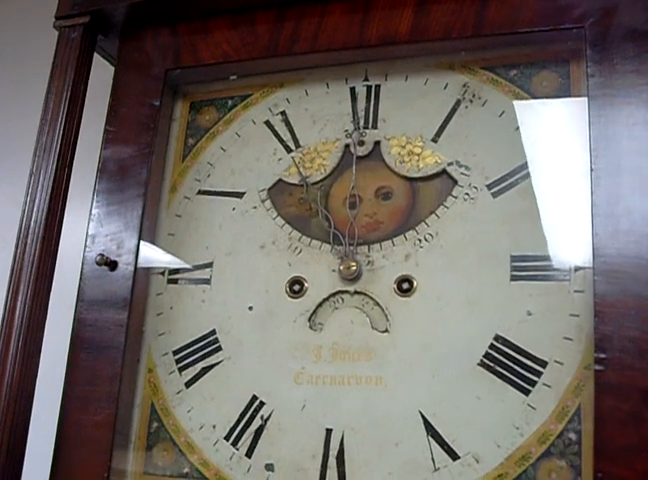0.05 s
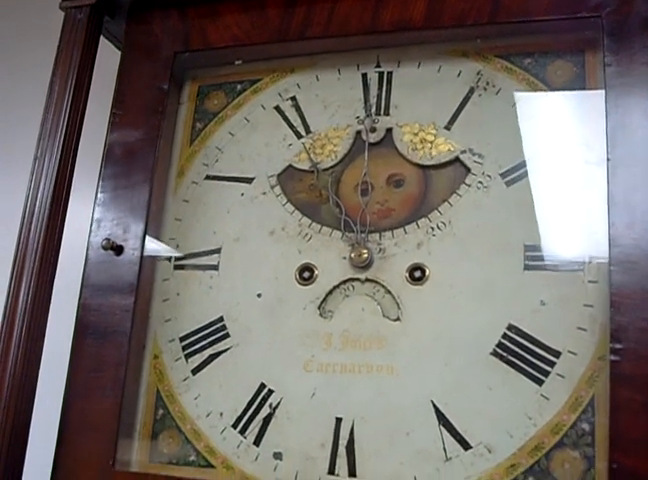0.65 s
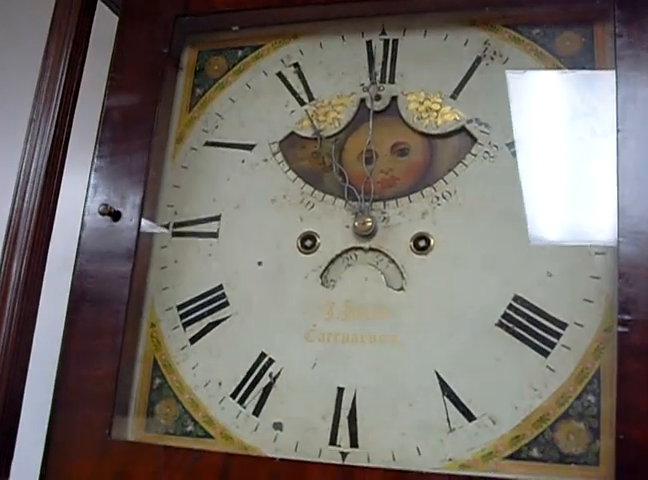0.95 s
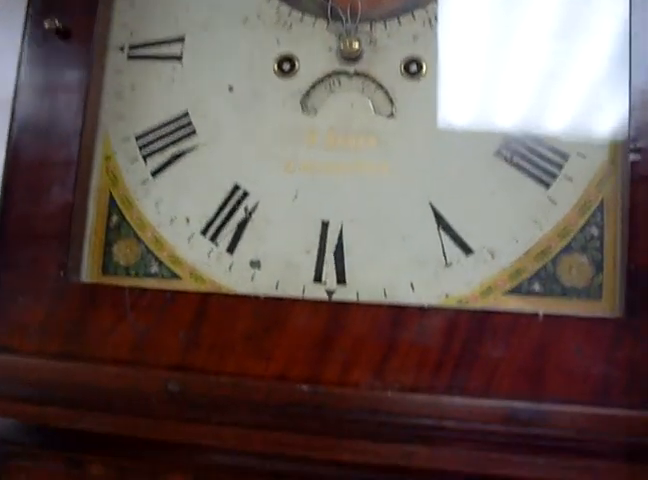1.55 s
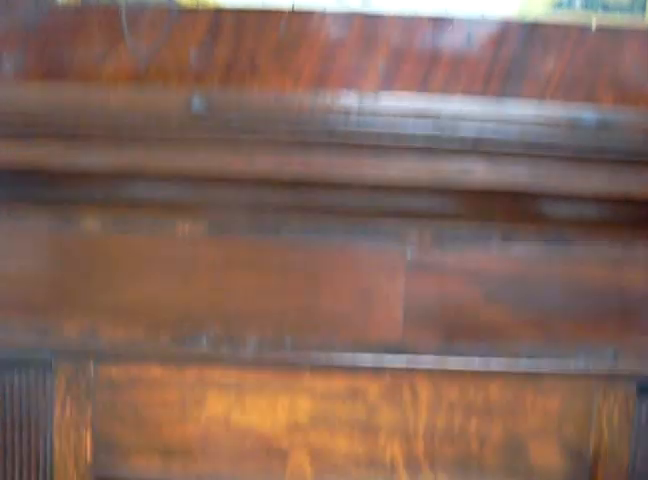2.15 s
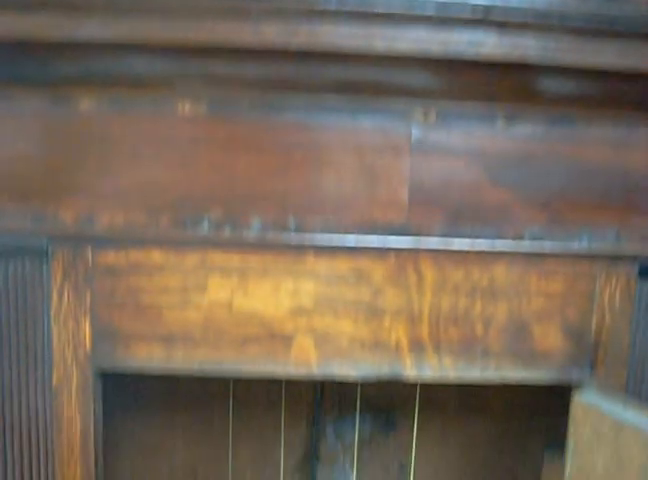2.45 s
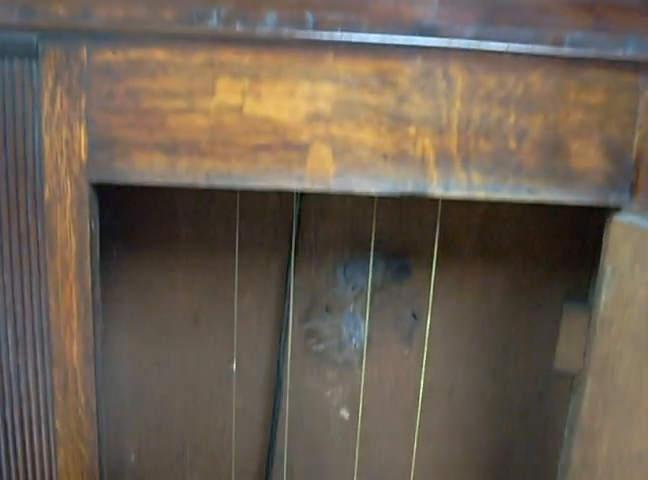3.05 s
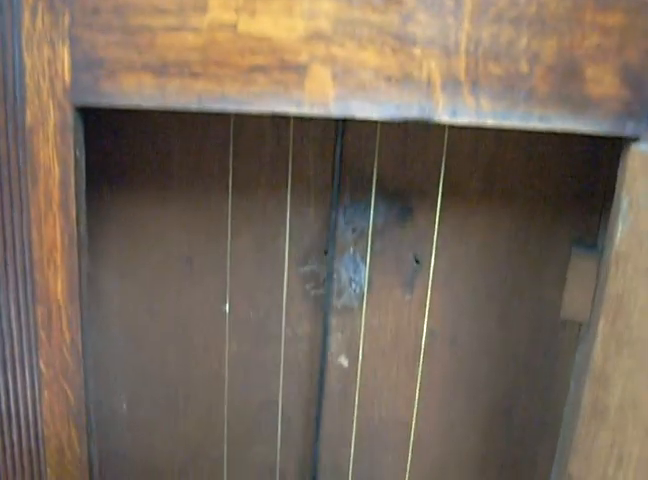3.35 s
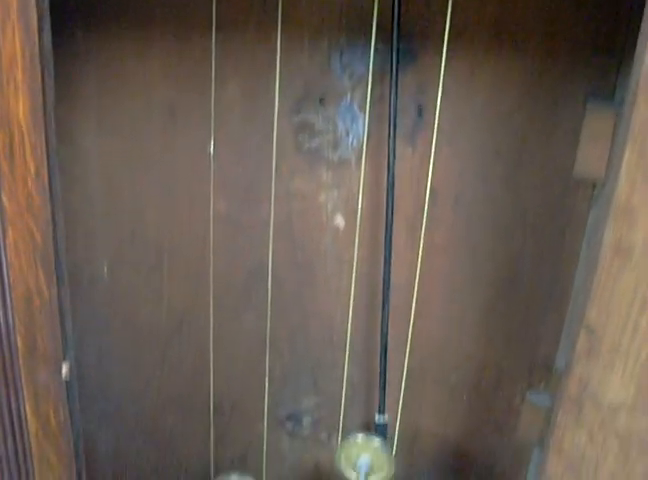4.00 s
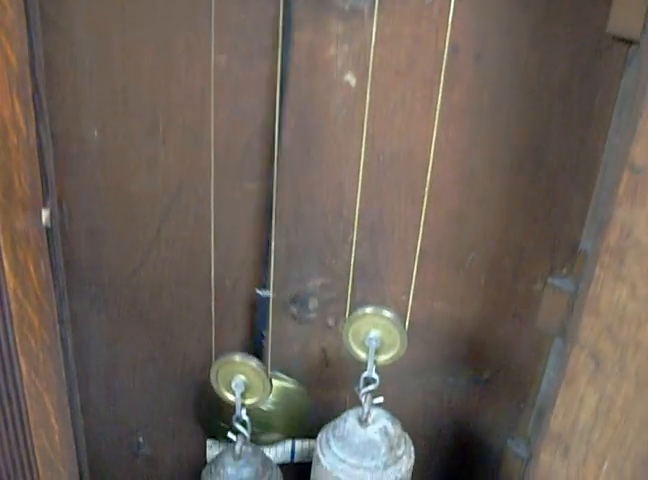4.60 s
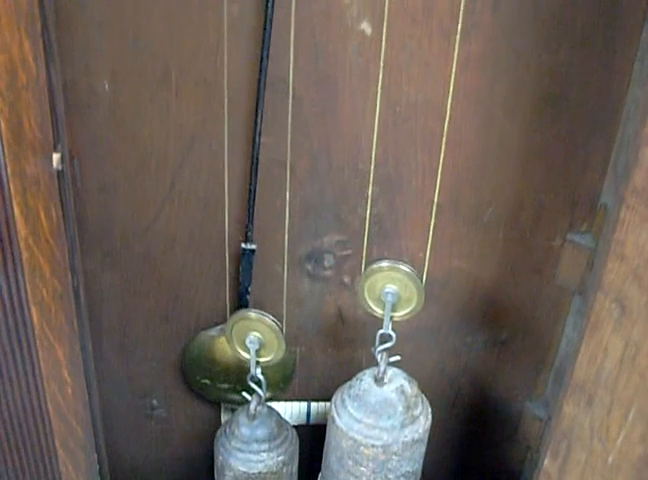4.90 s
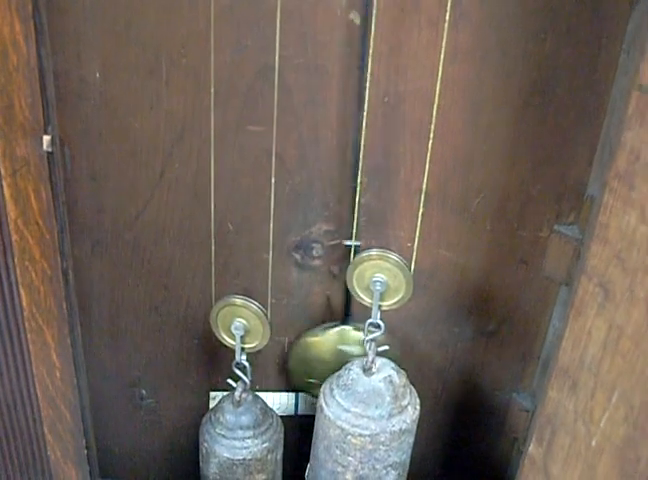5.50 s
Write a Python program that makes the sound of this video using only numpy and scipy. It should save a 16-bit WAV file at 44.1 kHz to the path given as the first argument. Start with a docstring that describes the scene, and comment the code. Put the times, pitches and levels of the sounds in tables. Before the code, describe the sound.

Close to a grandfather clock in a quiet room, a high metallic bell tone hangs in the air as gears whir softly. Levers knock and the hammer lands a last stroke, rattling briefly before the mechanism stops. The ring swells and dips as it dies away, leaving faint, slightly lopsided ticking, a single dry click and low hiss.

```python
"""A quiet room, close to a longcase clock. Its last stroke lands on a cast bell still ringing from the
one before. The striking train whirs, the hammer hits and chatters, the train locks; the split bell
modes beat and die away. The microphone sinks from the dial to the open trunk, through the bell's
standing waves, with soft hand bumps. A faint breathy swell passes. The seconds pendulum ticks
slightly out of beat."""
import sys
import numpy as np
from scipy import signal
from scipy.fft import rfft, irfft
from scipy.io import wavfile

SR = 44100
rng = np.random.default_rng(int(sys.argv[2]) if len(sys.argv) > 2 else 0)


def dump_mix(stems):
    """Bounce the given channels to the path in sys.argv[1] as a 16-bit WAV at rate SR."""
    frames = np.atleast_2d(stems).T  # one column per channel
    limited = np.clip(frames, -1, 1)  # hard clip at full scale
    pcm = np.round(limited * 32767).astype(np.int16)
    wavfile.write(sys.argv[1], SR, pcm)


N = 244314
TIME = np.arange(N) / SR
TRAIN_LOCK_S = 1.044
# bright, broad spectrum of clatter and crackle: (frequency [Hz], level [dB])
BRIGHT_SPECTRUM = [(300, -2), (1500, -4), (3000, 0), (6000, -0.5), (10000, 1), (12000, -16)]


def from_db(db):
    """Decibels to gain."""
    return 10 ** (np.asarray(db) / 20)


def unit_rms(x):
    """Scale to rms 1."""
    return x / np.sqrt(np.mean(x ** 2) + 1e-20)


def lag(x, tau_s):
    """One-pole smoothing, starting settled."""
    pole = np.exp(-1 / (tau_s * SR))
    return signal.lfilter([1 - pole], [1, -pole], x, zi=[pole * x[0]])[0]


def drift(corner_hz):
    """Low-passed random wander, rms 1."""
    bin_hz = np.arange(N // 2 + 1) * SR / N
    return unit_rms(irfft(rfft(rng.standard_normal(N)) / (1 + (bin_hz / corner_hz) ** 4), N))


def noise(spectrum):
    """Noise shaped by (frequency [Hz], level [dB]) rows, rms 1."""
    hz, db = np.transpose(spectrum)
    bin_hz = np.maximum(np.arange(N // 2 + 1) * SR / N, 1)
    gain = from_db(np.interp(np.log(bin_hz), np.log(hz), db))
    return unit_rms(irfft(rfft(rng.standard_normal(N)) * gain, N))


def decay(start_s, t60_s):
    """Gain that jumps to 1, then falls 60 dB per t60_s."""
    return (TIME >= start_s) * np.exp(-np.log(1000) * np.clip((TIME - start_s) / t60_s, 0, 10))


def ring(impulses, hz, t60_s):
    """Damped mode: a unit impulse starts a unit sine."""
    r = np.exp(-np.log(1000) / (t60_s * SR))
    w = 2 * np.pi * hz / SR
    return signal.lfilter([0, np.sin(w)], [1, -2 * r * np.cos(w), r * r], impulses + 1e-18)


def resonance(x, hz, width_hz):
    """Two-pole band-pass, peak gain 1."""
    r = np.exp(-np.pi * width_hz / SR)
    w = 2 * np.pi * hz / SR
    return signal.lfilter(np.array([1, 0, -1]) * (1 - r * r) / 2, [1, -2 * r * np.cos(w), r * r], x)


def blows(hits, spectrum, t60_s, tail_db, tail_t60_s, rise_s, grit_db=0):
    """Hits (time [s], level [dB]) wake dense short modes; loose parts add grit, case and room a tail."""
    grit = unit_rms(from_db(grit_db * drift(600)))
    direct_power = sum(from_db(db) ** 2 * decay(s, t60_s) ** 2 for s, db in hits)
    tail_power = sum(from_db(db + tail_db) ** 2 * decay(s, tail_t60_s) ** 2 for s, db in hits)
    direct = grit * lag(np.sqrt(direct_power), rise_s)
    tail = lag(np.sqrt(tail_power), rise_s)
    return np.hypot(direct, tail) * noise(spectrum)


def background_hiss(level_db=-71.0):
    """Steady noise floor."""
    # hiss spectrum: (frequency [Hz], density [dB])
    spectrum = [(25, 4), (60, 6), (90, 8.5), (140, -1), (250, -0.5), (400, -1), (1000, -8.5), (2300, -4.5),
                (3500, -5.5), (4100, -7.5), (4650, -1), (5500, -7), (10200, -8), (11300, -16.5),
                (12300, -25.5)]
    return from_db(level_db) * noise(spectrum)


def hand_bumps():
    """The hand shifts on the microphone housing: low thuds."""
    # hand shifts: (time [s], level [dB])
    bumps = [(1.30, -64), (2.64, -68)]
    # thud spectrum: (frequency [Hz], level [dB])
    spectrum = [(20, -6), (38, 7), (60, -1), (110, -19), (300, -60)]
    return blows(bumps, spectrum, t60_s=0.42, tail_db=-16, tail_t60_s=0.6, rise_s=0.015)


def soft_swell(start_s=2.06, attack_s=0.08, hold_s=0.11, release_s=0.34, level_db=-64.5, grain_db=1.5):
    """A faint, breathy swell of noise rises and fades."""
    # swell spectrum: (frequency [Hz], level [dB])
    spectrum = [(150, -10), (400, -1.5), (800, -1), (1400, -6.5), (2600, 5), (4000, -5.5), (9000, -13),
                (12000, -30)]
    corners_s = start_s + np.cumsum([0, attack_s, hold_s, release_s])
    envelope = np.interp(TIME, corners_s, [0, 1, 1, 0])
    return envelope * from_db(level_db + grain_db * drift(60)) * noise(spectrum)


def dry_clicks():
    """Something small and hard snaps near the microphone."""
    # snaps: (time [s], level [dB])
    snaps = [(3.379, -54.5), (4.3461, -37.5)]
    # the object's modes: (frequency [Hz], gain [dB], t60 [s])
    modes = [(740, -24, 0.04), (1180, -17, 0.011), (2030, -4.5, 0.015), (2250, -9, 0.029), (2860, 2, 0.017),
             (3860, 1, 0.0069), (4480, -1, 0.0085), (6900, -9.5, 0.0061), (8550, -10.5, 0.0075)]
    impulses = np.zeros(N)
    for s, db in snaps:
        impulses[round(s * SR)] = from_db(db)
    return sum((-1) ** k * from_db(db) * ring(impulses, hz, t60) for k, (hz, db, t60) in enumerate(modes))


def faint_crackle(start_s=1.044, clicks_per_s=16, click_s=0.0021, level_db=-49, spread_db=3, t60_s=3.5):
    """Faint, scattered high clicks fade away after the stroke."""
    impulses = (rng.random(N) < clicks_per_s / SR) * from_db(spread_db * rng.standard_normal(N))
    bursts = signal.lfilter([1], [1, -np.exp(-1 / (click_s * SR))], impulses + 1e-18)
    return from_db(level_db) * bursts * decay(start_s, t60_s) * noise(BRIGHT_SPECTRUM)


def escapement(period_s=2.0, tick_s=0.614, tock_s=1.486, tick_db=-57, tock_db=-67.5):
    """The escape wheel drops on two pallets in turn, unevenly; each has its own voice in the trunk."""
    # first pallet: (frequency [Hz], level [dB])
    tick_spectrum = [(120, -19), (300, -8), (410, -7), (480, 5), (580, -16), (740, -11), (835, 5),
                     (950, -13.5), (1700, -8), (2050, -20), (2320, -1), (3300, -20), (7800, -15.5),
                     (8750, -15), (10500, -35)]
    # second pallet: (frequency [Hz], level [dB])
    tock_spectrum = [(120, -12), (330, -4.5), (520, -4.5), (900, -13.5), (1200, -6.5), (1900, -11),
                     (2500, -8.5), (3600, -18.5), (9000, -27), (12000, -56)]
    swings_s = np.arange(0, N / SR, period_s)
    ticks = [(tick_s + s, tick_db) for s in swings_s]
    tocks = [(tock_s + s, tock_db) for s in swings_s]
    return (blows(ticks, tick_spectrum, t60_s=0.19, tail_db=-8, tail_t60_s=0.19, rise_s=0.0045)
            + blows(tocks, tock_spectrum, t60_s=0.46, tail_db=3.5, tail_t60_s=0.47, rise_s=0.00057))


def striking_train(mesh_hz=35.9, level_db=-61, throb_db=1.5, run_down_t60_s=0.86):
    """Wheel teeth mesh at the pace the fly allows and shake the wooden hood until the train locks."""
    # hood resonances: (frequency [Hz], nominal width [Hz], gain [dB])
    modes = [(139, 35, -5.5), (244, 55, -2.5), (292, 29, 2), (346, 33, 4), (406, 67, -6), (713, 16, -1),
             (753, 25, 5), (784, 41, -2), (1880, 190, -5), (2250, 870, -9)]
    tooth_hz = mesh_hz * (1 + 0.006 * drift(5))
    contacts = np.diff(np.floor(np.cumsum(tooth_hz) / SR), prepend=0)
    teeth = signal.sosfilt(signal.butter(4, 1000, fs=SR, output="sos"), unit_rms(contacts))
    rattle = rng.standard_normal(N)
    hood = np.zeros(N)
    for hz, width_hz, db in modes:
        first_pass = resonance(teeth + rattle, hz, 2 * width_hz)
        hood += from_db(db) * resonance(first_pass, hz, 2 * width_hz)
    running = np.maximum(TIME < TRAIN_LOCK_S, decay(TRAIN_LOCK_S, run_down_t60_s))
    return running * from_db(level_db + throb_db * drift(20)) * unit_rms(hood)


def lever_knocks():
    """Levers and hammer stop thump the seat board and clatter in the steelwork."""
    # knocks: (time [s], board level [dB], steel level [dB])
    knocks = [(0.772, -47.5, -53.5), (0.8955, -41.5, -37), (0.911, -42.5, -62), (.938, -64, -44.5),
              (0.961, -45.5, -37.5), (.98, -50, -45), (1.022, -67, -48), (1.055, -56, -48),
              (4.487, -65.5, -85)]
    # seat board spectrum: (frequency [Hz], level [dB])
    board_spectrum = [(25, -42), (60, -29), (130, -15), (220, -1.5), (340, 0), (460, -7), (610, -9.5),
                      (760, 4), (950, -35), (1350, -16), (1850, -7), (2200, -12), (2900, -1.5), (3600, -44),
                      (8000, -47)]
    board = blows([(s, db) for s, db, _ in knocks], board_spectrum,
                  t60_s=0.2, tail_db=-11, tail_t60_s=0.74, rise_s=0.0021)
    steel = blows([(s, db) for s, _, db in knocks], BRIGHT_SPECTRUM,
                  t60_s=0.099, tail_db=-13.5, tail_t60_s=1.0, rise_s=0.003, grit_db=0.5)
    return board + steel


def ring_hiss(chime, gain_db=-18):
    """A fine hiss rides on the ringing and fades with its high partials."""
    # hiss spectrum: (frequency [Hz], density [dB])
    spectrum = [(40, -11), (200, -10.5), (600, -5), (4000, -10.5), (9500, -8), (11000, -10.5), (12300, -67)]
    brightness = np.sqrt(lag(np.gradient(chime) ** 2, tau_s=0.01))
    peak = brightness.max()
    envelope = peak * (brightness / peak) ** 0.8
    return from_db(gain_db) * envelope * noise(spectrum)


def standing_wave(drop_cm, wave, dial_reach_cm=9.95, last_stroke_s=0.897):
    """Gain of one bell mode as the microphone leaves the dial and passes nodes and antinodes."""
    spacing_cm, node_cm, depth_db, antinode_db, dial_db, earlier_db = wave
    off_node = np.sin(np.pi * (drop_cm - node_cm) / spacing_cm) ** 2
    pattern = np.sqrt(off_node + from_db(depth_db) ** 2 * (1 - off_node))
    near_dial = np.clip(1 - drop_cm / dial_reach_cm, 0, 1)
    return pattern * from_db(antinode_db + dial_db * near_dial + earlier_db * (TIME < last_stroke_s))


def bell(rise_s=0.0029, waver_db=4.3, waver_hz=10.7):
    """Hammer contacts top up the bell's modes; light rebounds reach only the high ones."""
    # bell modes, mostly split pairs that beat: (frequency [Hz], level [dB], t60 [s])
    modes = [(601.2, -64, 76), (1490.6, -59, 90), (2700.3, -44, 20), (2721.8, -45, 8), (4149.3, -44, 3.2),
             (4185.1, -44, 3.5), (5815, -42, 2.1), (1526.7, -67, 13), (5892, -44.5, 1.7), (597.9, -75, 30),
             (7445, -61, .5), (7736, -48, .7), (7792, -55, .95), (8697, -47.5, .32), (8876, -48.5, .23),
             (9635, -60, .3), (9900, -50.5, .28), (10200, -64, .4)]
    # hammer contacts: (time [s], strength [dB], lowest fully driven frequency [Hz])
    contacts = [(-.2, 0, 100), (-.1, -2, 7600), (.897, 0, 100), (.964, .5, 5500), (1.022, 1, 8400)]
    # microphone path: (time [s], drop below the dial [cm])
    path = [(0, 0), (.9, 0.63), (1.4, 5), (1.65, 8), (2, 12), (2.35, 13.5), (2.85, 16.5), (3.7, 22.5),
            (4.25, 26.5), (4.65, 29.5), (5.54, 30.5)]
    # room patterns of the first nine modes: (node spacing [cm], node position [cm], node depth [dB],
    # antinode gain [dB], offset at the dial [dB], offset of the earlier stroke [dB])
    waves = [(34.3, 10.6, -9, 4.5, -8, 3), (14.74, 8.8, -5.5, 1.3, 0.2, -4.5),
             (6.93, 5.63, -14.5, -3.5, 13, -10.5), (5.146, 1.165, -27, 10, -8.5, 2.5),
             (19.9, 1.4, -21, 8.5, 10, -2.1), (3.865, 3.92, -17, 10.5, -6, 3),
             (5.6, 2.45, -8, 9.5, -7.1, -3), (15.7, 2.6, -9, 5, -1.6, 1.8),
             (3.86, 0.46, -3.5, -7.5, 12.5, -2.5)]
    # woodwork and the hanging weights screening the bell on the way down: (drop [cm], width [cm], tilt
    # [dB/kHz])
    screens = [(9.03, 5.06, -1.05), (11.73, .4, -2), (24.6, 2.3, -1.36)]
    drop_cm = np.interp(TIME, *np.transpose(path))
    tilt_db_per_khz = sum(tilt * np.exp(-((drop_cm - cm) / width) ** 2) for cm, width, tilt in screens)
    chime = np.zeros(N)
    for k, (hz, level_db, t60_s) in enumerate(modes):
        ringdowns = [from_db(db) * min(1, hz / low_hz) ** 8 * decay(s, t60_s)
                     for s, db, low_hz in contacts]
        if k < len(waves):
            room_gain = standing_wave(drop_cm, waves[k])
        else:
            room_gain = from_db(waver_db * drift(waver_hz))
        envelope = lag(np.max(ringdowns, axis=0) * room_gain, rise_s)
        screen_db = tilt_db_per_khz * hz / 1000
        tone = np.sqrt(2) * np.sin(2 * np.pi * (hz * TIME + rng.random()))
        chime += envelope * from_db(level_db + screen_db) * tone
    return chime


def scene():
    """Bell and movement over faint background noises, mono."""
    chime = bell()
    background = background_hiss() + hand_bumps() + soft_swell() + dry_clicks()
    movement = striking_train() + lever_knocks() + escapement()
    return (background + faint_crackle() + movement + ring_hiss(chime) + chime)[None]


def record(dry):
    """Steep elliptic low-pass at 12 kHz."""
    return signal.sosfilt(signal.ellip(10, 0.1, 70, 12000, fs=SR, output="sos"), dry)


dry = scene()
out = record(dry)
dump_mix(out)
```